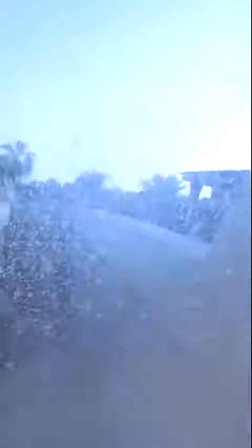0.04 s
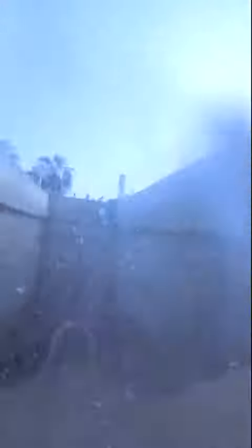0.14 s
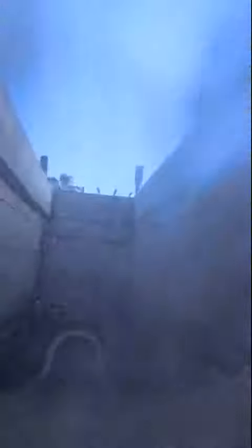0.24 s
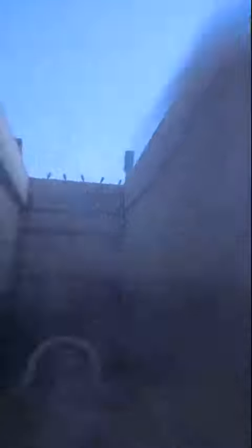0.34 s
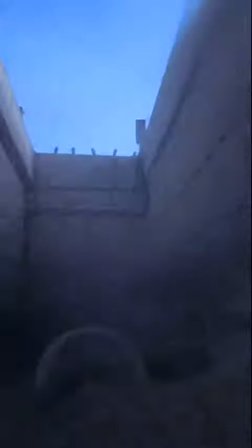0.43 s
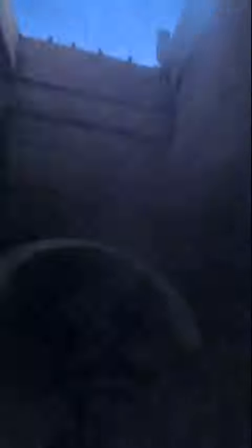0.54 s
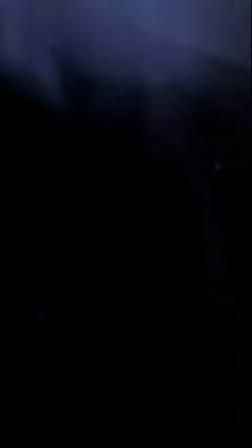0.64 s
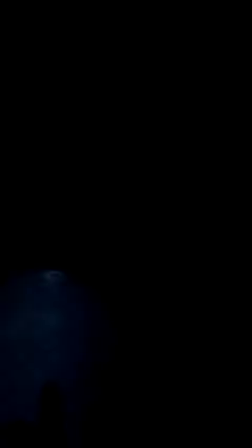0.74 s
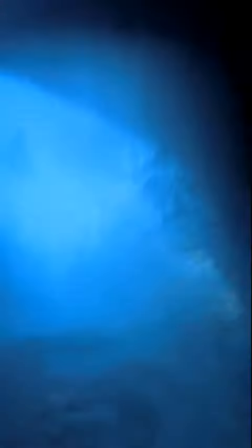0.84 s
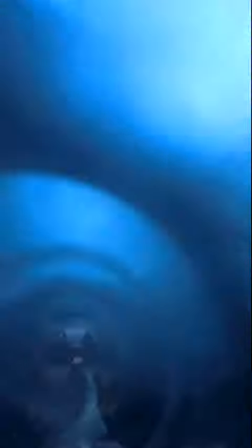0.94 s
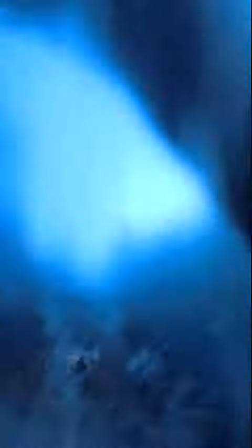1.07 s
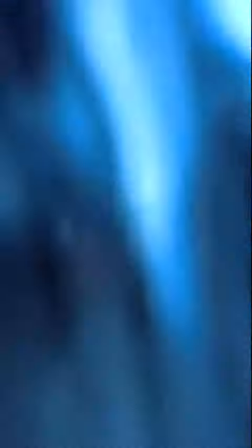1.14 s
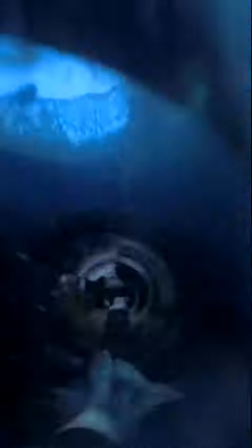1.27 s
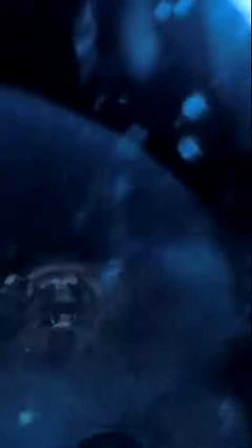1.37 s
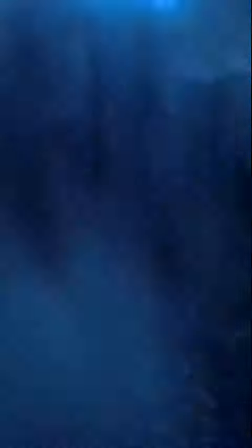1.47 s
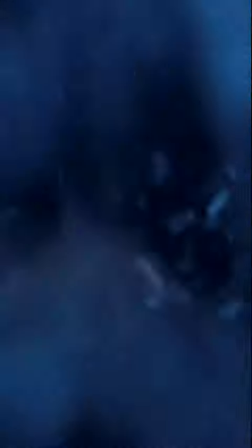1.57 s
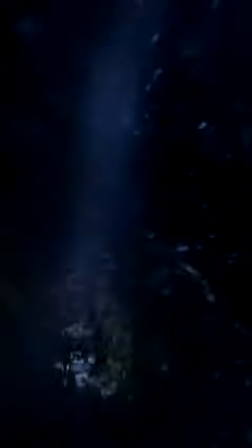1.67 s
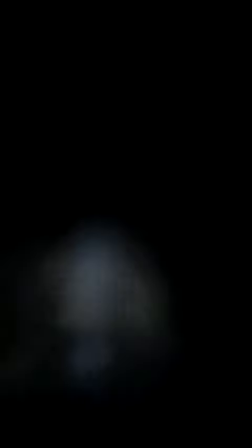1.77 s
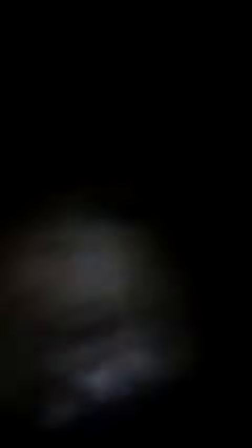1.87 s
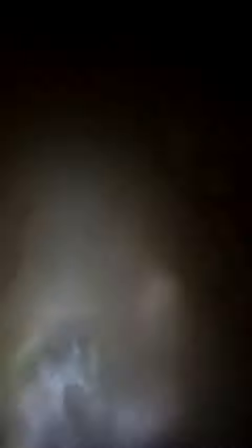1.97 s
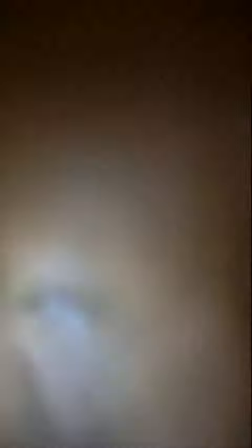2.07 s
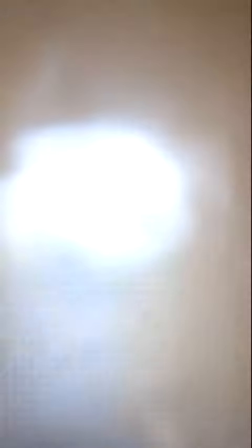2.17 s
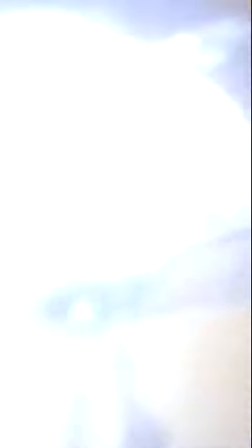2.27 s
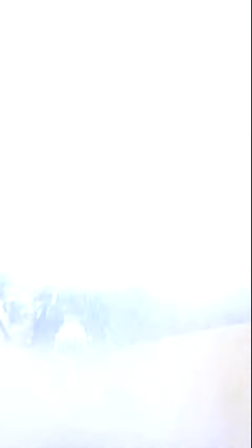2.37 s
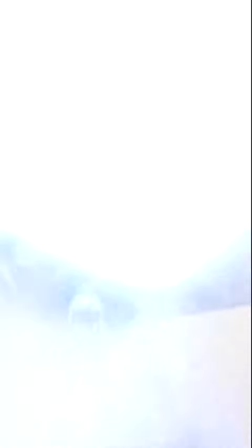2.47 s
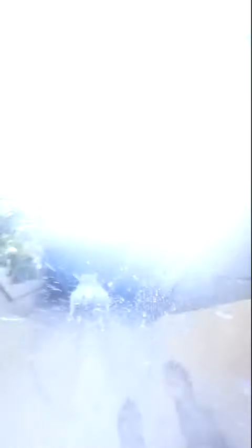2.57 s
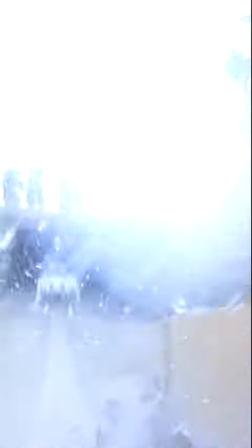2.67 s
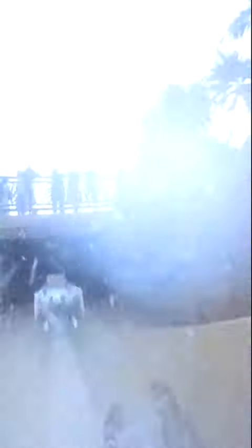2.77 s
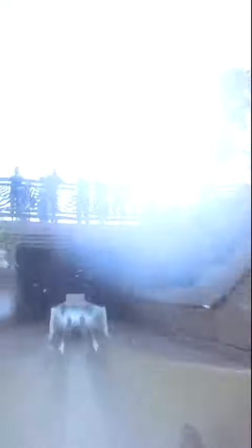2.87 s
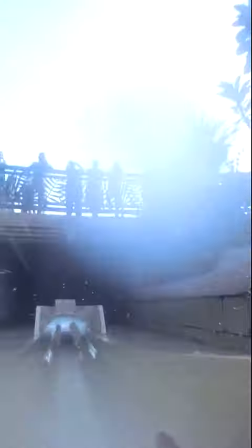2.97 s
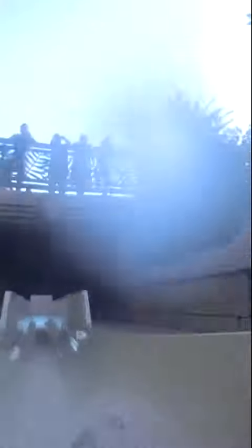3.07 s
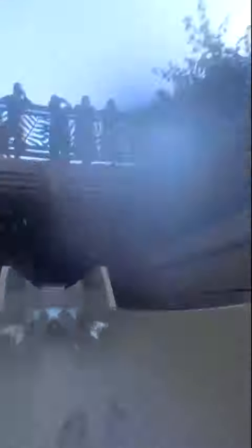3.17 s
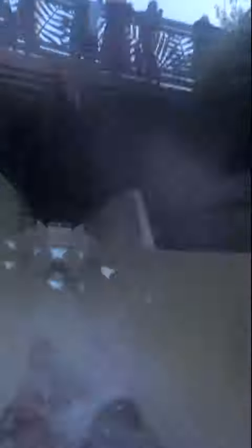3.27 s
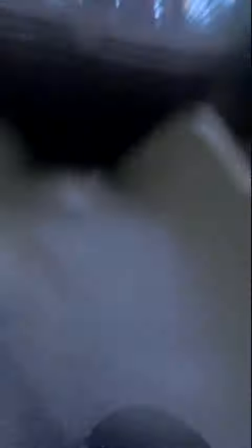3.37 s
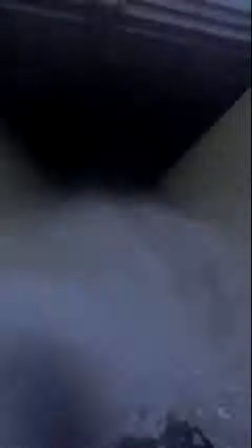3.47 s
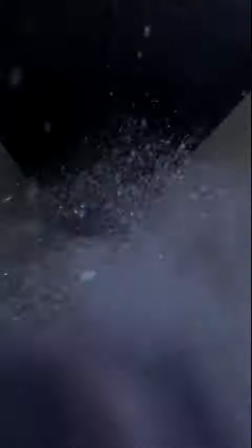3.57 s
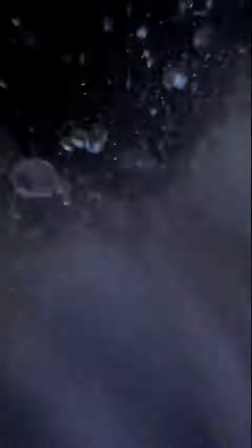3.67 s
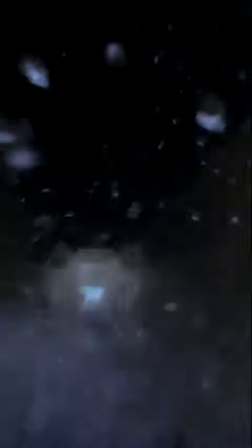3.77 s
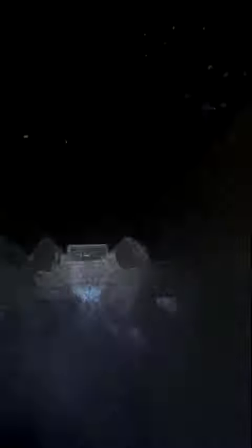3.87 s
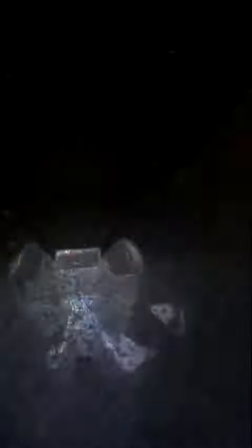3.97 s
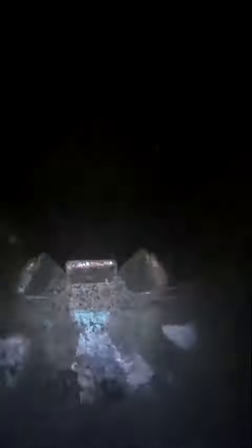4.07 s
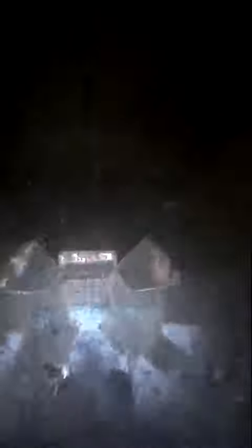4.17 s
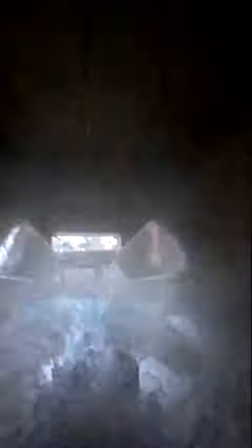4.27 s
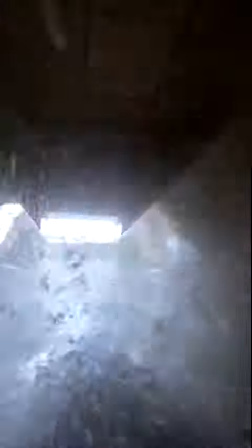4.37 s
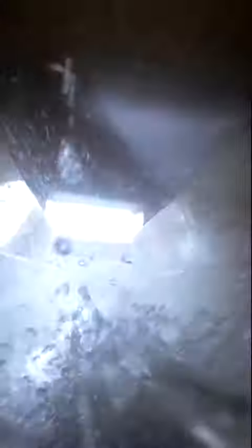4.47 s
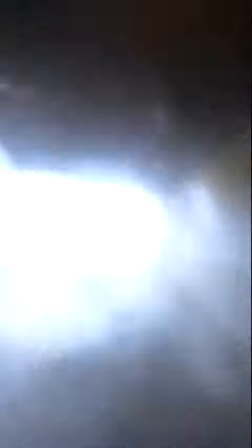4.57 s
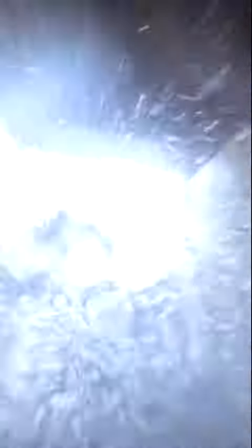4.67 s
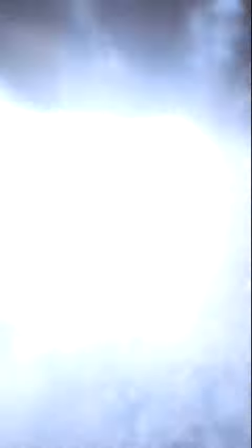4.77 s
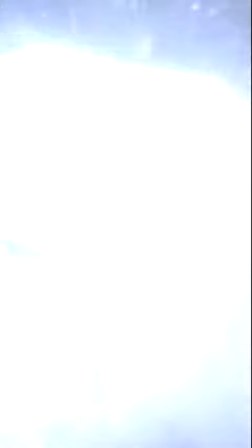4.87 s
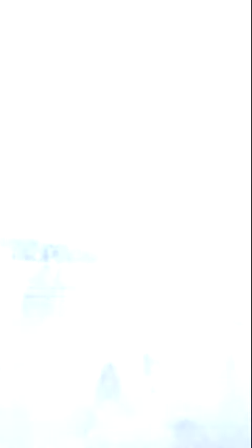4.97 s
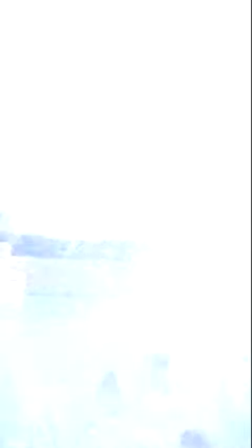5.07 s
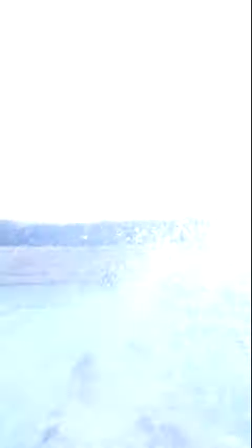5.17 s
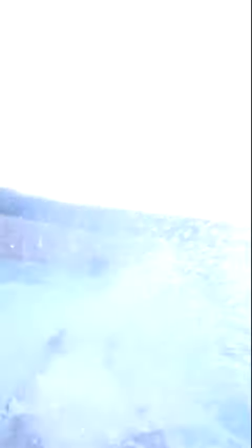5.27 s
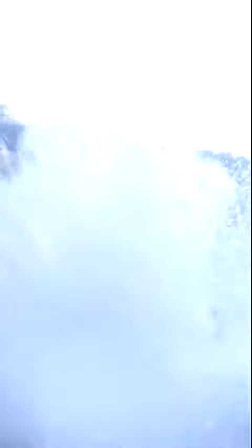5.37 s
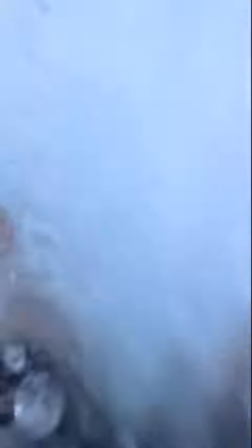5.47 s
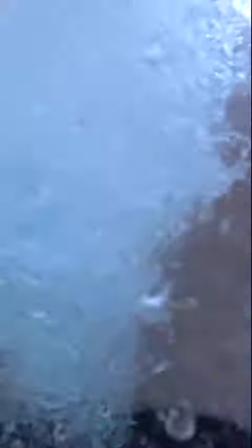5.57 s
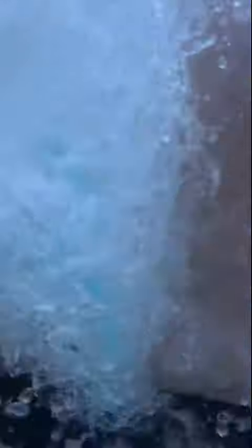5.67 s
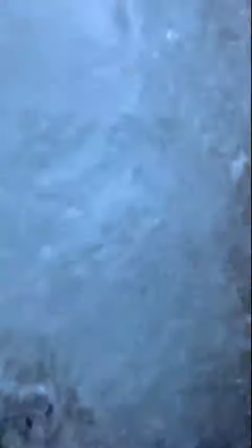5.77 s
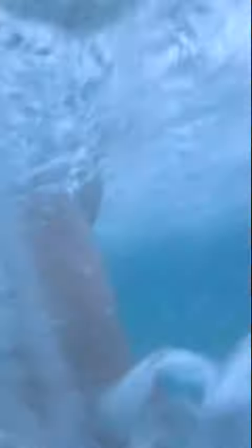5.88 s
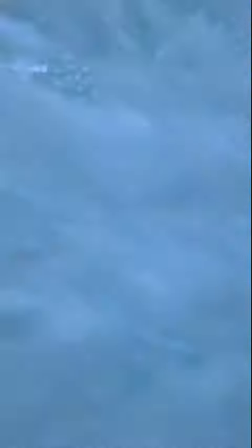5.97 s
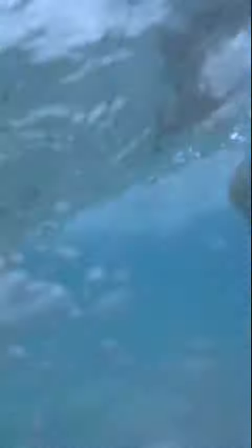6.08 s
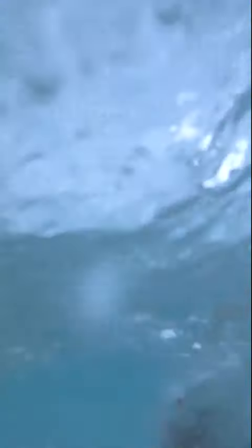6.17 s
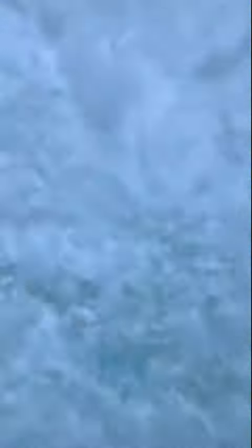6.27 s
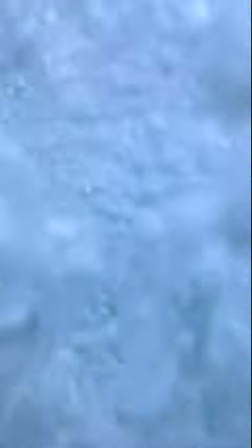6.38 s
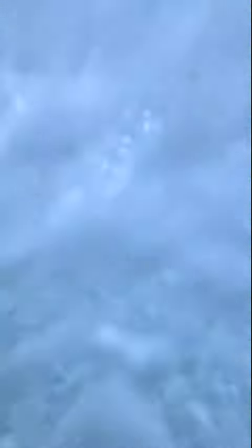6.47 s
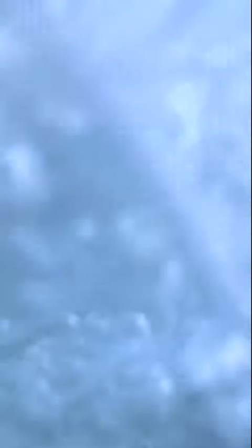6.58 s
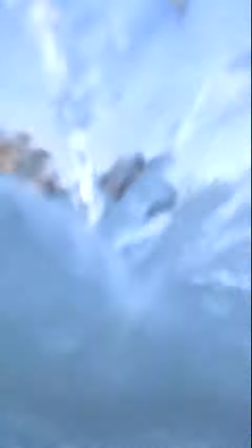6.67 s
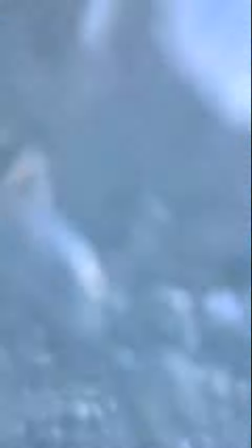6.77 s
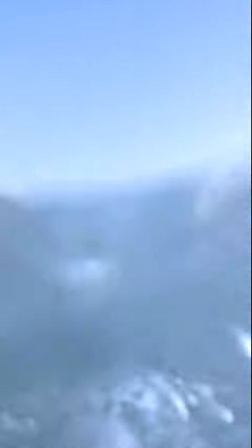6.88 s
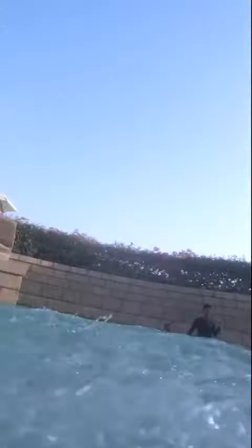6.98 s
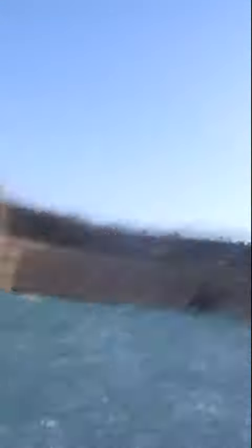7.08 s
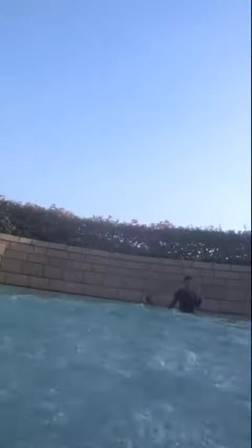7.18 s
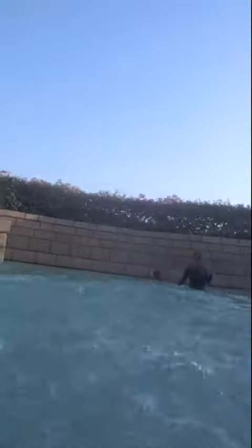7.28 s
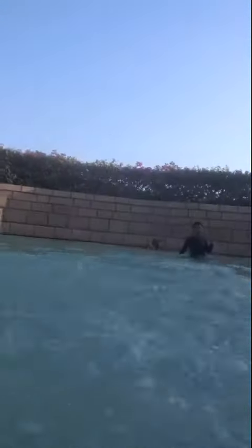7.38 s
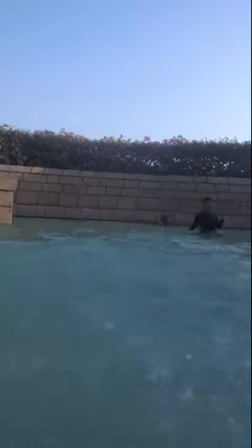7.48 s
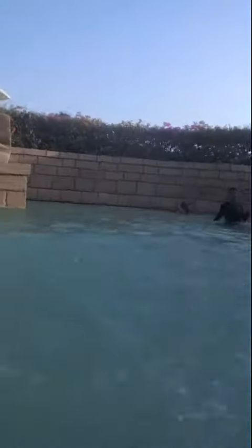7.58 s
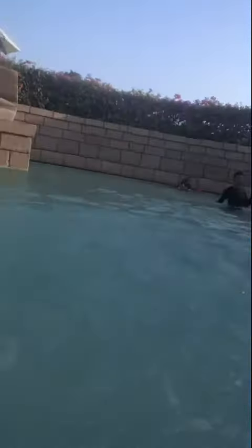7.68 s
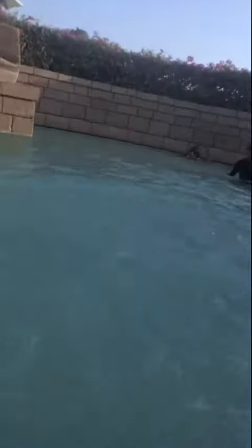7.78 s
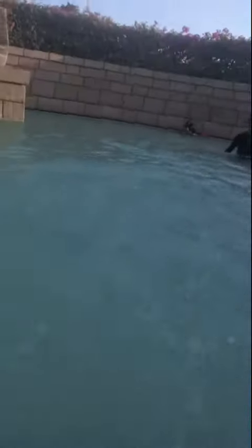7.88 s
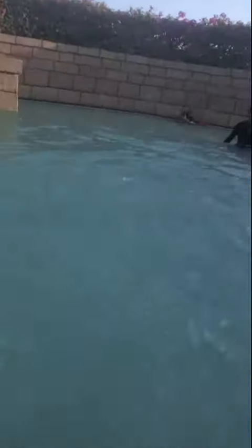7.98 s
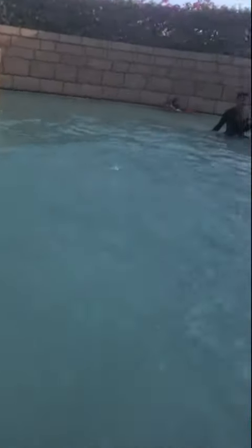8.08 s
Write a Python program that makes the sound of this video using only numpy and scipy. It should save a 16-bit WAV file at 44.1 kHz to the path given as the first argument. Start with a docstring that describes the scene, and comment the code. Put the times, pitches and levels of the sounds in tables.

```python
"""Spray patters on a phone's microphone as it rides down a steep water slide.
Sheets of water slosh over it, air buffets it, and lumps of water and fast drops slap and tick on it.
Near six seconds the phone smacks into the pool, where trapped air throbs and bubbles gurgle and crackle.
It comes up into a washing wave and bursting foam. A faint outdoor rumble lies under it all."""
import sys
import numpy as np
from scipy import signal
from scipy.fft import rfft, irfft, next_fast_len
from scipy.io import wavfile
from scipy.ndimage import uniform_filter1d, map_coordinates

SR = 44100
rng = np.random.default_rng(int(sys.argv[2]) if len(sys.argv) > 2 else 0)


def transcribe(signal):
    """Save signal, clipped to [-1, 1], as a 16-bit WAV file at the path in sys.argv[1]."""
    frames = np.atleast_2d(signal).T
    limited = np.clip(frames, -1, 1)
    pcm = np.round(limited * 32767).astype(np.int16)
    wavfile.write(sys.argv[1], SR, pcm)


N = 358091
TIME_S = np.arange(N) / SR
DIVE_S, RISE_S, SURFACE_S = 5.89, 6.39, 6.9  # the phone goes under, starts to rise, comes up


def amp(db):
    """Turns decibels into a gain to multiply by."""
    return 10 ** (np.asarray(db) / 20)


def unit(x):
    """Scales a sound to an average strength (rms) of 1."""
    return x / np.sqrt(np.mean(x ** 2) + 1e-20)


def levels(rows, fade_s):
    """One gain curve for each dB column, fading to silence beyond the table's ends."""
    times, *columns = np.transpose(rows)
    gate = np.interp(TIME_S, [times[0] - fade_s, times[0], times[-1], times[-1] + fade_s], [0, 1, 1, 0])
    return [gate * amp(np.interp(TIME_S, times, column)) for column in columns]


def wobble(per_s):
    """A smooth curve through per_s random values a second."""
    return map_coordinates(rng.standard_normal(int(N * per_s / SR) + 4), [TIME_S * per_s])


def colour(x, tone, size=8192):
    """Filters x to a tone given as rows of frequency_hz, level_db; only the shape counts."""
    hz, db = np.transpose(tone)
    gain = amp(np.interp(np.log(np.fft.rfftfreq(size, 1 / SR) + 1), np.log(hz), db))
    # folding the cepstrum makes the filter ring after a hit, never before it
    cepstrum = irfft(np.log(gain))
    cepstrum[1:size // 2] *= 2
    cepstrum[size // 2 + 1:] = 0
    pulse = irfft(np.exp(rfft(cepstrum)))
    return signal.fftconvolve(x, pulse / np.linalg.norm(pulse))[:N]


def add(track, start_s, sound):
    """Mixes a sound into the track."""
    start = int(np.clip(round(start_s * SR), 0, N))
    track[start:start + len(sound)] += sound[:N - start]


def sizes(count, spread_db):
    """Random gains: many small, few large."""
    return amp(spread_db * np.minimum(rng.standard_normal(count), 2.2))


def patter(per_s, spread_db):
    """Tiny hits at random moments, all pushing the same way."""
    hits = (rng.random(N) < per_s / SR) * sizes(N, spread_db)
    return unit(hits - hits.mean())


def scattered(gain, per_s, spread_db):
    """Random moments on the slide, as loud as a gain curve: start_s, level_db, chance (-1 to 1)."""
    count = int(per_s * DIVE_S)
    place, size, chance = rng.random((count, 3)).T
    start_s = (np.arange(count) + place) * DIVE_S / count
    curve_db = 20 * np.log10(np.interp(start_s, TIME_S, gain) + 1e-9)
    return start_s, curve_db + spread_db * np.sqrt(12) * (size - .5), 2 * chance - 1


# how much spray reaches the microphone: time_s, level_db
SPRAY_LEVELS = [(0, -37), (0.3, -42), (0.69, -38), (0.75, -31), (1.1, -29.5), (1.36, -33), (1.48, -30),
                (1.69, -43), (1.92, -38), (2.25, -42), (2.38, -35.5), (2.68, -46.5), (3.1, -49),
                (3.28, -37), (3.55, -43.5), (3.78, -39.5), (4.55, -45), (5.2, -45), (5.78, -41.5),
                (5.86, -26.5)]
# the hiss of mist and the tick of a drop: frequency_hz, level_db
MIST_TONE = [(300, -19.5), (1200, -3), (2400, -2), (3700, -10.5), (5200, -10.5), (6700, 0), (8500, -1.5),
             (11000, -11), (12500, -22), (15700, -22.5)]
DROP_TONE = [(150, -17.5), (700, 6.5), (2500, 0.5), (4000, -6.5), (7000, 2.5), (10500, -3), (12500, -14.5),
             (15700, -25)]


def spray(droplets, surge, wake):
    """Fine mist hisses and droplets tick on the microphone hole."""
    gain = np.hypot(amp(-.5) * levels(SPRAY_LEVELS, fade_s=0.035)[0], amp(-10.5) * wake)
    mist = colour(rng.standard_normal(N), MIST_TONE) * amp(1.5 * surge + 2.1 * wobble(400))
    return gain * (amp(-1.5) * mist + amp(-2) * colour(droplets, DROP_TONE))


# how much water runs past the phone: time_s, level_db
FLOW_LEVELS = [(0, -24.5), (0.3, -42.5), (0.6, -42), (1.12, -24.5), (1.38, -27), (1.49, -21), (1.68, -33),
               (2.25, -36.5), (2.38, -32.5), (3.1, -49), (3.3, -39), (3.6, -41), (3.82, -35.5),
               (4.9, -32.5), (5.2, -41.5), (5.35, -40), (5.72, -45.5), (5.85, -19)]
# the sound of sloshing: frequency_hz, level_db
SLOSH_TONE = [(15, -49), (60, -11.5), (230, 3), (480, 1.5), (800, -3.5), (1400, -9), (2500, -15),
              (3600, -23), (9000, -57)]


def sheets(droplets, surge, wake):
    """A film of water sloshes over the microphone, pushed partly by the droplets that land on it."""
    gain = np.hypot(amp(-1.5) * levels(FLOW_LEVELS, fade_s=0.059)[0], wake)
    film = unit(0.4 * droplets + patter(per_s=1800, spread_db=8.5))
    return gain * colour(film, SLOSH_TONE) * amp(-0.22 + 1.7 * surge)


# how hard the air blows: time_s, level_db
AIR_LEVELS = [(0, -36.5), (0.5, -40.5), (0.78, -29.5), (1.6, -35.5), (1.67, -43), (2.1, -32), (2.35, -48),
              (3.15, -54), (3.5, -46), (3.8, -44), (3.95, -48), (4.7, -40), (5.25, -52), (5.65, -46),
              (5.85, -21.5)]
# its low flutter: frequency_hz, level_db
AIR_TONE = [(15, -15.5), (40, -5), (110, 2.5), (190, -4), (350, -10.5), (900, -42), (3000, -75),
            (6000, -110)]


def air(surge, boom):
    """Air buffets the microphone; the same low noise swells when a large lump of water booms."""
    gain = np.hypot(levels(AIR_LEVELS, fade_s=.07)[0], boom)
    return gain * colour(patter(per_s=530, spread_db=3.5), AIR_TONE) * amp(-0.5 + 1.9 * surge)


def rumble():
    """The faint, steady rumble of the outdoors."""
    return amp(-64.5) * colour(rng.standard_normal(N), [(20, 0), (120, -5.5), (400, -23), (3000, -49)])


def small_lumps():
    """The flow throws up small lumps of water: start_s, level_db, rough_pitch_hz, splatter_db."""
    start_s, flow_db, speed = scattered(levels(FLOW_LEVELS, fade_s=.07)[0], per_s=12, spread_db=3)
    level_db = np.minimum(flow_db + 12.5, -15.5)
    # faster lumps sound higher and splatter more
    return list(zip(start_s, level_db, 285 * 2 ** (.6 * speed), level_db - 6 + 5 * speed))


# big lumps of water hitting the microphone: start_s, level_db, rough_pitch_hz, splatter_db, wake_db
BIG_LUMPS = [(0.011, -14.5, 139, -11, -44), (0.073, -3.5, 344, -7.5, -30.5), (0.0762, -7, 420, -13, -30),
             (0.11, -17, 240, -11, -42), (0.1343, -15, 250, -22, -45), (0.1854, -12.5, 736, -18.5, -49),
             (0.237, -3.5, 326, -7, -42), (0.34, -20, 260, -13, -48), (0.4705, -22, 370, -16, -50),
             (0.8781, -14, 257, -11.5, -44), (1.1026, -6, 368, -13, -21.5), (1.1177, -5.5, 330, -8, -24.5),
             (1.2537, -17.5, 170, -7, -31), (1.3658, -8, 302, -12.5, -42.5), (1.4177, -9.5, 640, -13, -27),
             (1.4796, 1, 363, -6, -17.5), (1.4834, -5, 308, 0, -20.5), (1.5993, -13.5, 290, -16, -22.5),
             (1.7421, -18, 200, -33.5, -32), (1.7612, -14.5, 243, -32.5, -30.5),
             (2.0151, -10.5, 217, -32, -32.5), (2.0739, -11, 460, -14, -21.5),
             (2.1377, -14.5, 210, -13.5, -40), (2.591, -20, 390, -40, -48),
             (2.6858, -20.5, 370, -24, -35.5), (2.8786, -5.5, 330, -10.5, -42),
             (2.9847, -25.5, 300, -20, -44), (3.306, -9.5, 202, -19, -36.5),
             (3.3188, -14.5, 460, -18.5, -39), (3.3757, -18.5, 290, -23, -43), (3.5806, -6, 220, -22, -29),
             (3.6017, -11, 188, -40, -32), (3.6624, -17, 198, -48, -46), (3.7421, -8.5, 116, -11, -24),
             (3.7511, -16, 158, -23, -27.5), (3.8081, -5.5, 143, -25.5, -17.5),
             (4.0259, -12, 277, -23.5, -55), (4.0642, -20, 200, -22, -36), (4.1684, -16.5, 310, -24.5, -34),
             (4.2204, -10.5, 289, -18, -46), (4.2786, -11, 189, -38, -38), (4.412, -11.5, 315, -15, -48),
             (4.4381, -10.5, 223, -15.5, -43), (4.4732, -20, 200, -24, -47), (4.687, -7.5, 153, -18, -33),
             (4.6988, -6.5, 211, -22, -29), (4.7579, -13.5, 414, -11.5, -37),
             (4.7949, -12.5, 160, -22.5, -40), (4.8018, -9.5, 238, -21, -34.5),
             (4.9132, -15.5, 318, -36, -36), (5.0447, -13, 307, -14, -40), (5.1272, -18.5, 364, -16.5, -48),
             (5.1545, -28, 293, -16, -55), (5.3943, -16.5, 270, -36, -44), (5.433, -8.5, 193, -20.5, -28),
             (5.8354, -6, 365, -12.5, -28.5), (5.8684, -3, 148, -10.5, -22.5),
             (5.889, -10.5, 150, -21.5, -39), (5.9164, -7, 101, -40.5, -34.5)]
# a lump breaking up: frequency_hz, level_db
SPLATTER_TONE = [(30, -26.5), (200, -12), (800, -1), (1600, -3), (2600, -9), (4000, -17), (7000, -9),
                 (10500, -14), (12500, -21), (15700, -31.5)]


def slaps():
    """Each lump of water gives a short push, a longer suck and a small rebound, and splatters."""
    pushes, splatter = np.zeros(N), np.zeros(N)
    t = np.arange(SR // 25) / SR
    for start_s, level_db, rough_pitch_hz, splatter_db, *_ in list(BIG_LUMPS) + small_lumps():
        # the more a lump splatters, the harder it has hit and the shorter its push
        hardness = np.clip((splatter_db - level_db + 15) / 12, 0, 1)
        turns = 1.18 * rough_pitch_hz * t
        swing = np.sin(2 * np.pi * turns ** (.85 - 0.25 * hardness))
        fade = np.exp(-(turns / 1.01) ** (2.4 - hardness))
        lead_s = (.17 - 0.084 * hardness) / rough_pitch_hz
        add(pushes, start_s - lead_s, amp(level_db + 1) * swing * fade)
        burst = 0.25 * rng.standard_normal(len(t)) * np.exp(-t / 0.001)
        burst[0] += 1  # the first touch
        add(splatter, start_s, amp(splatter_db + 6) * burst)
    return pushes + colour(splatter, SPLATTER_TONE)


def wakes(rise_s=0.0092, fall_s=0.027, boom_below_hz=210):
    """Water swells round each big lump. Two gain curves: higher lumps slosh, deeper ones boom."""
    slosh, boom = np.zeros(N), np.zeros(N)
    lead_s = .1
    t = np.arange(SR // 3) / SR - lead_s
    swell = np.exp(np.minimum(t / rise_s, -t / fall_s))
    for start_s, _, rough_pitch_hz, _, wake_db in BIG_LUMPS:
        boom_share = 1 / (1 + (rough_pitch_hz / boom_below_hz) ** 4)
        add(slosh, start_s - lead_s, amp(wake_db) * np.sqrt(1 - boom_share) * swell)
        add(boom, start_s - lead_s, amp(wake_db + 2.5) * np.sqrt(boom_share) * swell)
    return slosh, boom


# the hardest single drops: start_s, level_db
HARD_DROPS = [(0.0572, -3), (0.139, -3.5), (0.1966, -12), (0.2028, -8.5), (0.2802, -6), (0.3465, -5.5),
              (0.4605, -7.5), (0.5325, -7), (0.5746, -12), (0.7331, -5), (0.8041, -1.5), (0.8358, -1.5),
              (0.8779, -1.5), (0.927, -0.5), (0.9915, -4.5), (1.0678, 1), (1.2233, -6), (1.2421, -2.5),
              (1.4964, 3), (2.9566, -14), (3.3427, -8.5), (3.5276, -7.5), (3.5827, -4.5), (3.9624, -10.5),
              (4.1136, -13.5), (4.5495, -13), (4.6836, -5.5), (5.0094, -12.5)]


def hard_drops():
    """Fast drops hit the microphone head-on: a tick, then a millisecond of flying bits."""
    ticks = np.zeros(N)
    t = np.arange(SR // 200) / SR
    starts_s, spray_db, _ = scattered(levels(SPRAY_LEVELS, fade_s=.03)[0], per_s=13, spread_db=2)
    lesser_drops = zip(starts_s, np.minimum(spray_db + 24.5, -7))
    for start_s, level_db in [*HARD_DROPS, *lesser_drops]:
        burst = 0.34 * rng.standard_normal(len(t)) * np.exp(-t / 0.00041)
        burst[0] = 1
        add(ticks, start_s, amp(level_db + 3) * burst / np.linalg.norm(burst))
    return colour(ticks, DROP_TONE)


# moments when water covers the microphone hole: start_s, end_s, change_db
COVERED = [(1.178, 1.24, -5.5), (1.365, 1.412, -10), (3.61, 3.722, -8), (5.869, 6, -5.5)]


def water_cover():
    """A gain curve that dips while water shields the microphone from the rush."""
    db = sum(change_db * ((TIME_S > start_s) & (TIME_S < end_s)) for start_s, end_s, change_db in COVERED)
    return amp(uniform_filter1d(db, size=256))


# the pool's surface tearing: frequency_hz, level_db
SMACK_TONE = [(150, -15), (700, 4), (2500, -1), (4300, 1), (7000, -0.5), (10500, -8.5), (12500, -13.5),
              (15700, -25)]


def smack(start_s, length_s, level_db):
    """The phone cuts through the pool's surface with a short tearing crash."""
    crash = np.zeros(N)
    window = signal.windows.tukey(int(length_s * SR))
    add(crash, start_s, amp(level_db) * window * patter(per_s=9000, spread_db=3)[:len(window)])
    return colour(crash, SMACK_TONE)


def bubbles(per_s, middle_hz, octaves, ring_cycles, spread_db, size=1024):
    """A cloud of bubbles, each ringing briefly and rising a little in pitch."""
    count = int(per_s * N / SR)
    pitch_hz = middle_hz * 2 ** (octaves * rng.uniform(-1.022, 1, (count, 1)))
    turns = pitch_hz * np.arange(size) / SR
    age = np.minimum(turns / ring_cycles, 10)
    tones = np.sin(2 * np.pi * turns * (1 + 0.01 * age))
    tones *= np.exp(-age) * (1 - np.exp(-2 * turns)) * np.linspace(1, 0, size)
    tones *= sizes(count, spread_db)[:, None] * np.sqrt(middle_hz / pitch_hz)  # small bubbles are weaker
    where = rng.integers(0, N, (count, 1)) + np.arange(size)
    return unit(np.bincount(where.ravel(), tones.ravel(), N)[:N])


# big pockets of trapped air: frequency_hz, level_db
CHURN_TONE = [(15, -22), (40, -13), (85, -0.5), (170, -0.5), (260, -8.5), (400, -20.5), (700, -44),
              (2000, -65), (5000, -110)]


def churn():
    """Big air pockets throb, each about as strongly as the last."""
    pockets = colour(rng.standard_normal(N), CHURN_TONE)
    power = np.abs(uniform_filter1d(pockets ** 2, size=2500))
    return unit(pockets / np.sqrt(power + .2))


# froth under water: frequency_hz, level_db
FROTH_TONE = [(20, -33), (150, -14), (400, 2.5), (600, -4), (850, -15.5), (1400, -16.5), (2200, -27.5),
              (3000, -34.5), (7000, -64)]


def gurgle():
    """Middle-sized bubbles ring, muffled, in a bed of froth."""
    froth = colour(patter(per_s=1100, spread_db=7.5), FROTH_TONE)
    large = bubbles(per_s=160, middle_hz=520, octaves=.7, ring_cycles=3.5, spread_db=3)
    small = bubbles(per_s=250, middle_hz=1300, octaves=.7, ring_cycles=6, spread_db=3)
    muffle = signal.butter(4, 2400, fs=SR, output="sos")
    return amp(1) * froth + signal.sosfilt(muffle, amp(-1) * large + amp(-9) * small)


# tiny bubbles under water: frequency_hz, level_db
CRACKLE_TONE = [(1200, -19), (2700, -5), (4000, -5), (5300, -5), (7000, 0.5), (10000, 0.5), (11500, -7),
                (13000, -12.5), (15700, -17.5)]


def crackle():
    """The nearest tiny bubbles ping on the case over the fizz of the whole cloud."""
    pings = bubbles(per_s=550, middle_hz=6400, octaves=.85, ring_cycles=7, spread_db=7)
    fizz = patter(per_s=2500, spread_db=7)
    return amp(-1) * unit(colour(pings + amp(-1) * fizz, CRACKLE_TONE))


# clouds of bubbles brushing the phone: middle_s, half_length_s, gurgle_db, crackle_db
BUBBLE_CLOUDS = [(5.923, 0.039, -38.5, -54), (6.07, 0.039, -40, -47), (6.172, 0.032, -56, -55),
                 (6.561, 0.049, -36, -56), (6.718, 0.084, -45, -62.5)]


def plunge(build_s=0.0355):
    """Under water, the trapped air churns until the phone rises; the bubbles thin out from the start."""
    since_dive_s, since_rise_s, since_surface_s = (
        np.maximum(TIME_S - moment_s, 0) for moment_s in (DIVE_S, RISE_S, SURFACE_S))
    # each fade is written as dB lost per second times the seconds gone by
    under_water = (TIME_S > DIVE_S) * amp(-230 * since_surface_s)
    churn_gain = amp(-14.5 - 40 * since_rise_s) * (1 - np.exp(-since_dive_s / build_s))
    gurgle_gain = amp(-30.5 - 15.5 * since_dive_s)
    crackle_gain = amp(-55.5 - 11 * since_dive_s)
    for middle_s, half_length_s, gurgle_db, crackle_db in BUBBLE_CLOUDS:
        cloud = np.exp(-((TIME_S - middle_s) / half_length_s) ** 2)
        gurgle_gain += amp(gurgle_db) * cloud
        crackle_gain += amp(crackle_db) * cloud
    return under_water * (churn_gain * churn() + gurgle_gain * gurgle() + crackle_gain * crackle())


# single bubbles that stand out: start_s, level_db, pitch_hz, decay_s
SINGLE_BUBBLES = [(6.559, -19.5, 1110, 0.0033), (6.78, -20, 169, 0.028), (6.79, -49, 3300, .004),
                  (6.861, -50, 2650, 0.0043), (6.865, -22.5, 230, 0.016), (7.015, -44, 553, 0.019),
                  (7.06, -45.5, 651, 0.025), (7.625, -41, 330.7, .012), (7.751, -36.5, 327, 0.012),
                  (7.836, -31, 537, 0.0039)]


def glugs():
    """Bubbles break loose as the phone comes up; each rings and rises in pitch."""
    track, t = np.zeros(N), np.arange(SR // 6) / SR
    for start_s, level_db, pitch_hz, decay_s in SINGLE_BUBBLES:
        age = t / decay_s
        ring = np.sin(2 * np.pi * pitch_hz * t * (1 + 0.0326 * age))
        shape = np.exp(-age) * (1 - np.exp(-pitch_hz * t))
        add(track, start_s, amp(level_db) * ring * shape)
    return track


# how lively the pool's surface is: time_s, wash_db, foam_db
POOL_LEVELS = [(6.952, -55.5, -79), (7.002, -55.5, -71), (7.071, -53.5, -68.5), (7.181, -60, -67),
               (7.52, -53.5, -61.5), (7.66, -47, -57), (7.83, -51, -51), (7.979, -59.5, -59.5),
               (8.12, -58, -56.5)]
# washing water and bursting foam: frequency_hz, level_db
WASH_TONE = [(20, 1.5), (150, -3.5), (320, 2), (520, -2.5), (750, 0), (1100, 2), (1700, -3.5), (2600, -9),
             (3800, -31), (8000, -50)]
FOAM_TONE = [(1500, -2.5), (2800, -0.5), (3800, -10), (5200, -5.5), (7000, -0.5), (9500, -4), (11000, -13),
             (12300, -31), (15700, -28.5)]


def pool_wave():
    """The wave from the landing washes across the pool, with plops and bursting foam."""
    wash_gain, foam_gain = levels(POOL_LEVELS, fade_s=0.069)
    water = colour(rng.standard_normal(N), WASH_TONE) * amp(1.06 * wobble(30))
    plops = bubbles(per_s=520, middle_hz=1200, octaves=1.5, ring_cycles=5, spread_db=4)
    foam = colour(patter(per_s=7000, spread_db=7.5), FOAM_TONE)
    return wash_gain * (amp(-4) * water + amp(-5) * plops) + foam_gain * amp(1.5) * foam


def scene():
    """The slide, the landing and the pool, in one channel."""
    wake, boom = wakes()
    surge = wobble(70)  # spray, water and air all surge together
    droplets = patter(per_s=1300, spread_db=10.5)
    dip = water_cover()
    ride = dip * spray(droplets, surge, wake) + np.sqrt(dip) * sheets(droplets, surge, wake)
    ride += air(surge, boom) + slaps() + hard_drops()
    going_in = smack(start_s=5.86, length_s=0.0045, level_db=-12.5)
    coming_out = smack(start_s=6.822, length_s=0.0033, level_db=-42)
    return (ride + going_in + plunge() + glugs() + coming_out + pool_wave() + rumble())[None]


def record(dry):
    """The microphone rounds off the strongest blows and loses the very highest treble."""
    ceiling, top_hz = .69, 15800
    rounded = dry / (1 + np.abs(dry / ceiling) ** 6) ** (1 / 6)
    size = next_fast_len(N + SR // 4)
    heard = np.fft.rfftfreq(size, 1 / SR) < top_hz
    return irfft(rfft(rounded, size) * heard, size)[:, :N]


dry = scene()
out = record(dry)
transcribe(out)
```